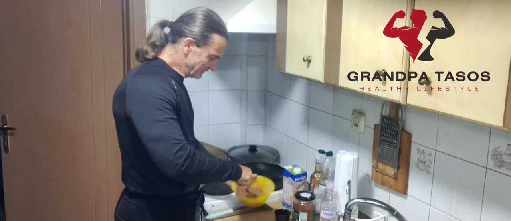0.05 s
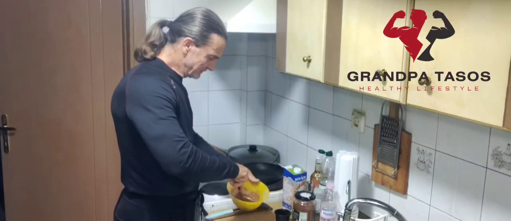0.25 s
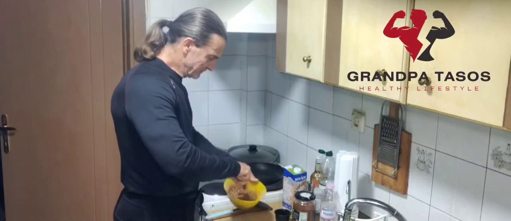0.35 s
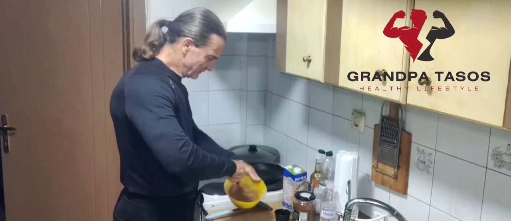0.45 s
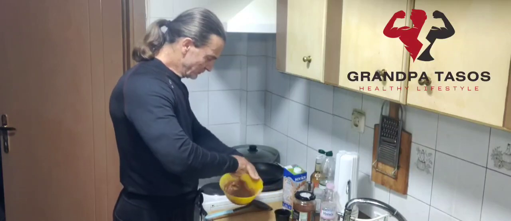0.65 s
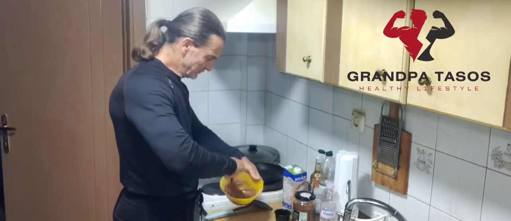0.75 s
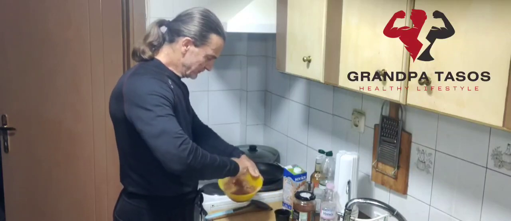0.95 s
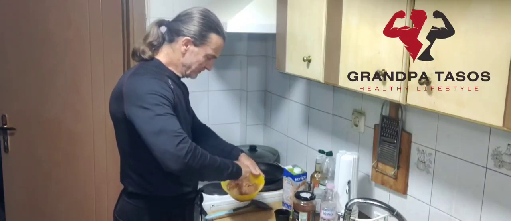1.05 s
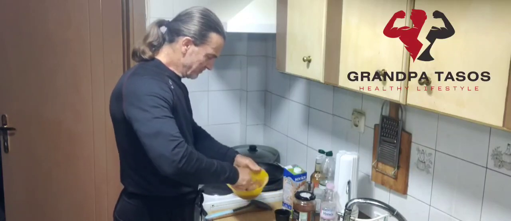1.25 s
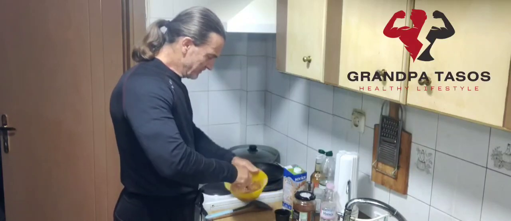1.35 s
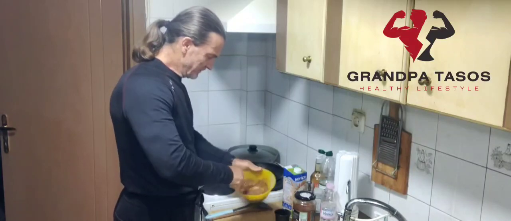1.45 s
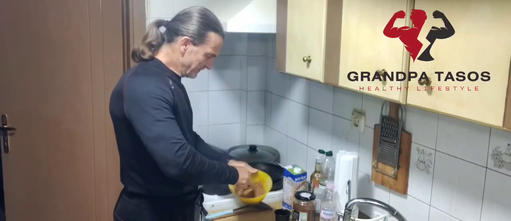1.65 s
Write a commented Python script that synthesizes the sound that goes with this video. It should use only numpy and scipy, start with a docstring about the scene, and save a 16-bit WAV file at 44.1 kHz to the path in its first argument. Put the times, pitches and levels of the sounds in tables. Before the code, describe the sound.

Quick hollow thuds of batter being whisked in a plastic bowl in a small tiled kitchen

```python
"""Beating batter in a plastic bowl

A spoon beats thick batter in a bowl on a counter in a small tiled kitchen, about four strokes a second.
Strokes are thuds with fixed echoes, plus cracks and scattered clicks that ring the bowl's resonances.
Swells of fine grit make the edge scrape through the batter; now and then the batter lets go with a small
wet tick, a click with a narrow high fizz. Dense noise tails give the room, banded noise the low hum."""
import sys
import numpy as np
from scipy import signal
from scipy.io import wavfile

SR = 44100
rng = np.random.default_rng(int(sys.argv[2]) if len(sys.argv) > 2 else 0)


def put_to_file(sound):
    """Save the sound as 16-bit audio at rate SR, in the file named by the first command-line argument."""
    columns = np.atleast_2d(sound).T  # one column per channel
    safe = np.clip(columns, -1, 1)
    whole_steps = np.round(safe * 32767)
    wavfile.write(sys.argv[1], SR, whole_steps.astype(np.int16))


def to_linear_factor(level_db):
    """Convert decibel levels (scalar or array-like) to linear amplitude factors."""
    exponent = np.asarray(level_db, float) / 20
    return 10 ** exponent


N = 74970   # samples heard
LEAD = SR // 10   # samples run before the start, then dropped
M = N + LEAD
T = (np.arange(M) - LEAD) / SR   # time_s

# room hum and hiss, relative spectrum: pitch_hz, density_db (per Hz)
HUM_SPECTRUM = [(15, -47), (25, -18.5), (79, 5.5), (457, -5.5), (945, -2.5), (1380, -11), (3830, -13),
                (5880, -23), (7100, -19.5), (15500, -28.5)]
# knocks on the wall: start_s, thud_db, thud_hz, crack_db, scatter_db (scattered reflections), hold_s,
# then the colour of the spot struck: low_db, middle_db, high_db, upper_middle_db
WALL_KNOCKS = [(-.045, -22.5, 850, -48, -44.5, 0.052, 0.5, -2, 0, -7),
               (0.2199, -14, 865, -33.5, -41.5, 0.0514, 5.5, -2, -12, -8),
               (0.4849, -19, 867, -29, -42, 0.068, -3.5, 1, -4.5, 4),
               (0.731, -10.5, 801, -14.5, -36.5, 0.056, -2.5, 9.5, 10, 11.5),
               (0.9941, -23, 1024, -20, -45.5, 0.0616, 3, 2, -4.5, 10.5),
               (1.2503, -22.5, 830, -29, -46, 0.062, -4.5, -1.5, 4.5, 6.5),
               (1.455, -31, 800, -39, -50.5, 0.057, -3, -7.5, -19, 4),
               (1.513, -46, 920, -33, -55, 0.053, -3.5, -7, -30, 4.5)]
# arrivals of a thud, direct (shaded by the cook) and off counter, tiles, cupboards; the wall's two faces
# push in opposite senses: delay_ms, signed_share (ratio)
THUD_ARRIVALS = [(0, -.4), (4.49, 1), (6.99, .41), (11.95, .43), (18.55, .47), (22.27, -.36), (23.52, -.64),
                 (25.9, -.32), (28.92, .28), (30.64, -.42), (38.37, -.33), (40.25, .29), (43.5, -.37),
                 (48.44, .34)]
# resonances of the bowl: pitch_hz, width_hz, level_db
BOWL_RESONANCES = [(85, 55.2, -31.5), (179.3, 52, -20.5), (320, 164, -7), (551, 298, -0.5), (800, 86, 1.5),
                   (975, 120, -4.5), (1184, 95, -3), (1399, 80, -4.5), (1860, 470, 2), (2410, 245, -2),
                   (2585, 550, -3), (3517, 270, -2), (4130, 100, -3), (4450, 1280, -2), (6190, 930, -0.5),
                   (9060, 2600, -9.5)]
# kitchen reverberation: pitch_hz, t60_s
ROOM_DECAY = [(200, 0.37), (800, 0.21), (2000, 0.2), (5000, 0.21), (12000, 0.24)]
# scrapes of the edge: peak_s, rise_s, fall_s, level_db, low_db (drive of low resonances relative to high)
EDGE_SCRAPES = [(0.005, 0.019, 0.14, -70.5, 7.5), (0.176, 0.038, 0.037, -41.5, -3),
                (0.221, 0.04, 0.016, -53.5, 3), (0.263, 0.019, 0.029, -52, -1.5),
                (.37, 0.035, 0.069, -70.5, 2), (0.569, 0.094, 0.016, -52.5, -4.5),
                (0.818, 0.079, 0.074, -43.5, -16.5), (0.983, 0.012, 0.06, -60, -10),
                (1.037, 0.029, 0.035, -44.5, -33), (1.093, 0.11, 0.029, -54, 1),
                (1.277, 0.025, 0.044, -35, -12), (1.348, 0.081, 0.1, -55.5, -10.5),
                (1.461, 0.015, 0.067, -45.5, -13), (1.514, 0.0039, 0.044, -48.5, -6),
                (1.568, 0.019, 0.18, -63, -16)]
# resonances of the scraped wall: pitch_hz, width_hz, level_db
WALL_RESONANCES = [(725, 1600, 1), (1460, 680, 3.5), (2840, 910, -0.5), (3480, 605, -5), (4240, 2200, -0.5),
                   (6015, 1210, 0.5), (8580, 1300, -11.5), (12900, 7600, -17.5)]
# batter lets go: start_s, level_db, pitch_hz
BATTER_TICKS = [(0.107, -66, 5000), (0.3955, -63, 5700), (0.952, -61.5, 6500), (1.639, -62, 5020)]

HUM_DB, HUM_WAVER_DB, HUM_WAVER_S = -62, 0.35, 0.032
LOW_UNDER_HZ, MIDDLE_OVER_HZ, UPPER_OVER_HZ, HIGH_OVER_HZ = 700, 1330, 2150, 3000
THUD_WIDTH_HZ = 514   # the wall flexes for a cycle or two
CONTACT_HZ = 2970   # batter softens the contact for the lower resonances
CRACK_LAG_S, CRACK_ECHO_DB = .0004, -10   # the edge lands just after the flat
SCATTER_PER_S, SCATTER_SPREAD_DB = 5000, 1.5
SAG_DB_PER_S, SAG_GROWS_PER_OCTAVE = 10.5, 80   # scatter fade; dB per s more for each octave up
KNOCK_LUCK_DB, RELEASE_S = 0.86, 0.0089   # chance in each resonance; fade that ends the hold
ROOM_DB, ROOM_GAP_S = -11, 0.012
RAMP_DB, RAMP_POWER = 20.5, 1.54   # depth reached after one rise or fall; curve of the ramp
SCRAPE_PER_S, SCRAPE_SPREAD_DB, SCRAPE_SPLIT_HZ = 13000, 3, 3200
PATCHY_DB, PATCH_S = 2, 0.016   # wet and dry patches under the edge
FIZZ_PER_S, FIZZ_SPREAD_DB, TICK_FIZZ_T60_S = 6000, 3, 0.098
TICK_WIDTH_HZ, TICK_RISE_S = 1400, .0004
TICK_SNAP_DB = 16.5   # the first click, relative to the tick level
GATE_DB, GATE_SLOPE, GATE_DEPTH_DB = -54.5, 1, 12   # slope in dB of cut per dB below the threshold
GATE_RELEASE_S, GATE_LISTENS_HZ, GATE_AHEAD = 0.0091, 307, 90   # look-ahead in samples
TOP_HZ = 15700


def rms_one(x):
    """Scale to rms 1."""
    return x / np.sqrt(np.mean(x ** 2) + 1e-20)


def at_hz(points, hz):
    """Read a table on a log-frequency axis."""
    table_hz, values = np.array(points).T
    return np.interp(np.log(hz), np.log(table_hz), values)


def resonate(x, hz, width_hz):
    """Two-pole resonance; white noise keeps its level."""
    r = np.exp(-np.pi * width_hz / SR)
    feed = np.sqrt((1 - r * r) / 2) * np.array([1, 0, -1])
    ring = [1, -2 * r * np.cos(2 * np.pi * hz / SR), r * r]
    return signal.lfilter(feed, ring, x + 1e-18)


def grains(per_s, spread_db):
    """Random clicks of uneven size and either sign; rms 1."""
    sizes = to_linear_factor(spread_db * np.minimum(rng.exponential(1, M), 4)) * rng.choice([-1, 1], M)
    return rms_one(sizes * (rng.random(M) < per_s / SR))


def bands(n):
    """White noise cut into half-octave bands, each with its centre frequency."""
    edges = 22 * 2 ** np.arange(0, 9.6, .5)
    white = rng.standard_normal((2, n))   # neighbouring bands take different noises
    for k, (low, high) in enumerate(zip(edges, edges[1:])):
        band_pass = signal.butter(2, [low, high], "band", fs=SR, output="sos")
        yield np.sqrt(low * high), signal.sosfilt(band_pass, white[k % 2])


def waver(step_s):
    """Chance drift gliding to a new value every step; rms about 1."""
    knots = np.arange(T[0], T[-1] + step_s, step_s)
    return np.interp(T, knots, rng.standard_normal(400)[:len(knots)]) * np.sqrt(1.5)


def hum():
    """Steady low rumble and faint hiss, shaped from noise bands, that waver a little."""
    noise = rms_one(sum(to_linear_factor(at_hz(HUM_SPECTRUM, hz)) * band for hz, band in bands(M)))
    return to_linear_factor(HUM_DB + HUM_WAVER_DB * waver(HUM_WAVER_S)) * noise


def spot_colour_db(hz, low, middle, high, upper):
    """The spot struck favours some bowl resonances over others."""
    if hz < LOW_UNDER_HZ:
        return low
    if hz > HIGH_OVER_HZ:
        return high
    if hz > UPPER_OVER_HZ:
        return upper
    return middle if hz > MIDDLE_OVER_HZ else 0


def knocks():
    """A thud repeated by the kitchen's hard faces; a crack, its first echo and dense scatter ring the bowl."""
    out = np.zeros(M)
    scatter = grains(SCATTER_PER_S, SCATTER_SPREAD_DB)
    luck = rng.normal(0, KNOCK_LUCK_DB, (len(WALL_KNOCKS), len(BOWL_RESONANCES)))
    soft = signal.butter(4, CONTACT_HZ, fs=SR, output="sos")
    delays_ms, shares = np.transpose(THUD_ARRIVALS)
    lags = (delays_ms * SR / 1000).astype(int)
    for (s, thud_db, thud_hz, crack_db, scatter_db, hold_s, *spot), own_db in zip(WALL_KNOCKS, luck):
        i = int(s * SR) + LEAD
        t = T[i:i + SR // 6] - s
        held = np.clip((hold_s - t) / RELEASE_S, 0, 1)
        dense = scatter[i:i + len(t)] * to_linear_factor(scatter_db) * held
        thuds, cracks = np.zeros((2, len(t)))
        thuds[lags] = to_linear_factor(thud_db) * shares
        cracks[lags[:2] + int(CRACK_LAG_S * SR)] = to_linear_factor(crack_db), to_linear_factor(crack_db + CRACK_ECHO_DB)
        lower, upper = np.zeros((2, len(t)))
        flex = resonate(thuds * held, thud_hz, THUD_WIDTH_HZ)
        lower -= resonate(flex, thud_hz, THUD_WIDTH_HZ)
        for k, (hz, width_hz, db) in enumerate(BOWL_RESONANCES):
            # higher resonances lose their scatter sooner
            sag = SAG_DB_PER_S + SAG_GROWS_PER_OCTAVE * max(np.log2(hz / LOW_UNDER_HZ), 0)
            ring = resonate(cracks + dense * to_linear_factor(-sag * t), hz, width_hz)
            part = upper if hz > HIGH_OVER_HZ else lower
            part += (-1) ** k * to_linear_factor(db + own_db[k] + spot_colour_db(hz, *spot)) * ring
        out[i:i + len(t)] += signal.sosfilt(soft, lower) + upper
    return out


def kitchen(x):
    """Dense reflections after a short gap, dying band by band."""
    t = np.arange(SR // 2) / SR
    tail = sum(band * to_linear_factor(-60 * t / at_hz(ROOM_DECAY, hz)) for hz, band in bands(len(t)))
    tail = tail * (t > ROOM_GAP_S)
    return signal.fftconvolve(x, tail / np.sqrt(np.sum(tail ** 2)))[:M]


def scrapes():
    """Fine dense grit swells and fades under the edge; each scrape has its own share of the low resonances."""
    high, low = np.zeros(M), np.zeros(M)
    for s, rise_s, fall_s, db, low_db in EDGE_SCRAPES:
        ramp = np.where(T < s, (s - T) / max(rise_s, .003), (T - s) / max(fall_s, .003))
        swell = to_linear_factor(db - RAMP_DB * ramp ** RAMP_POWER)
        high += swell
        low += swell * to_linear_factor(low_db)
    grit = grains(SCRAPE_PER_S, SCRAPE_SPREAD_DB)
    out = np.zeros(M)
    for k, (hz, width_hz, db) in enumerate(WALL_RESONANCES):
        drive = low if hz < SCRAPE_SPLIT_HZ else high
        level = to_linear_factor(db + PATCHY_DB * waver(PATCH_S))
        out += (-1) ** k * level * resonate(grit * drive, hz, width_hz)
    return out


def ticks():
    """Small wet smacks: a click, then grains that fizz out in a narrow high band."""
    out = np.zeros(M)
    fizz = grains(FIZZ_PER_S, FIZZ_SPREAD_DB)
    for s, db, hz in BATTER_TICKS:
        onset = np.clip((T - s) / TICK_RISE_S, 0, 1)
        burst = fizz * onset * to_linear_factor(db - 60 * np.maximum(T - s, 0) / TICK_FIZZ_T60_S)
        burst[int(s * SR) + LEAD] += to_linear_factor(db + TICK_SNAP_DB)
        out += resonate(resonate(burst, hz, TICK_WIDTH_HZ), hz, TICK_WIDTH_HZ)
    return out


def scene():
    """Bowl, its room, and the hum."""
    bowl = knocks() + scrapes() + ticks()
    return (bowl + to_linear_factor(ROOM_DB) * kitchen(bowl) + hum())[None, LEAD:]


def roll_off(x):
    """The treble ends steeply here."""
    return signal.sosfilt(signal.butter(12, 16500, fs=SR, output="sos"), x)


def record(dry):
    """A noise suppressor turns quiet passages further down, then the top is cut."""
    r = np.exp(-1 / (GATE_RELEASE_S * SR))
    high_pass = signal.butter(2, GATE_LISTENS_HZ, "high", fs=SR, output="sos")
    heard = signal.sosfilt(high_pass, dry)
    settled = heard[:, :400].var(axis=1, keepdims=True)   # start the follower at the opening level
    power = signal.lfilter([1 - r], [1, -r], heard ** 2, zi=settled)[0]
    level_db = 10 * np.log10(power + 1e-14)
    ahead_db = np.roll(level_db, -GATE_AHEAD, axis=1)
    gated = dry * to_linear_factor(np.clip(GATE_SLOPE * (ahead_db - GATE_DB), -GATE_DEPTH_DB, 0))
    mix = signal.sosfilt(signal.butter(8, TOP_HZ, fs=SR, output="sos"), gated)
    return roll_off(mix)


dry = scene()
out = record(dry)
put_to_file(out)
```